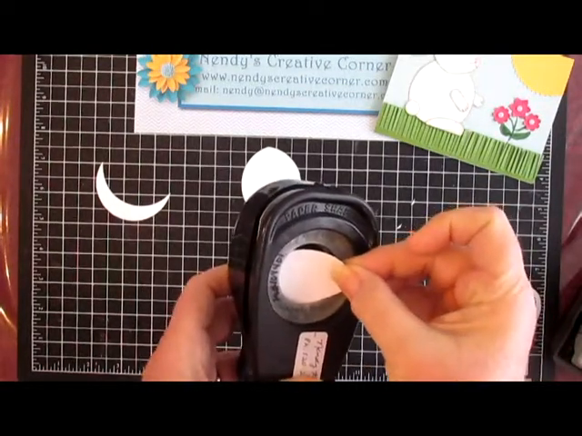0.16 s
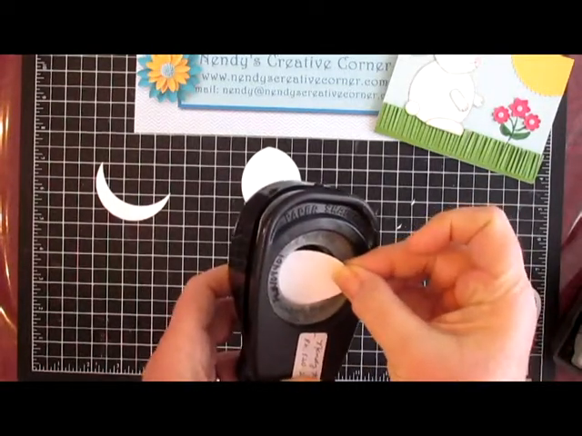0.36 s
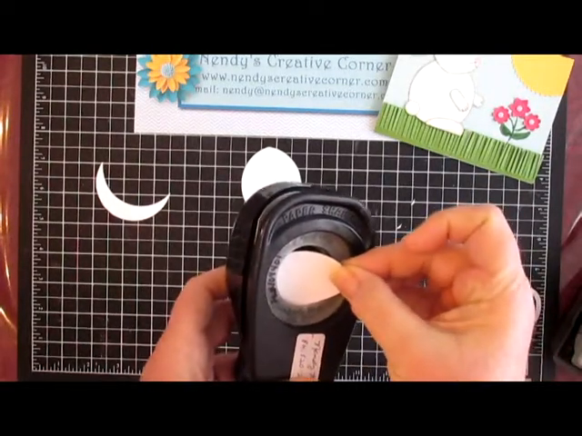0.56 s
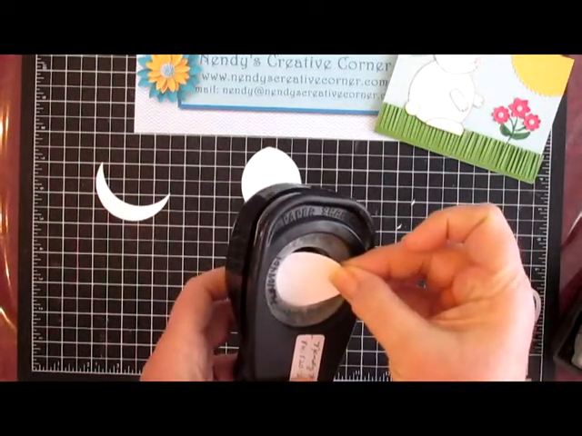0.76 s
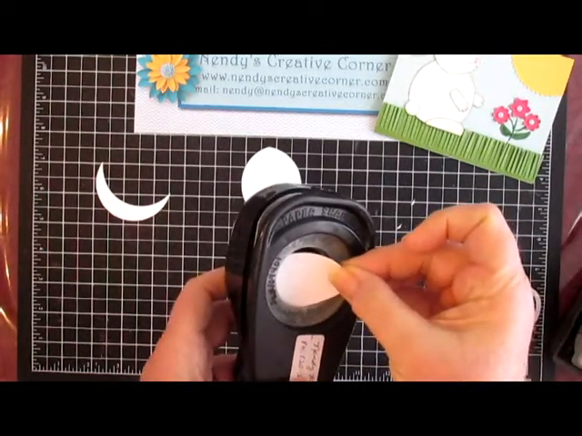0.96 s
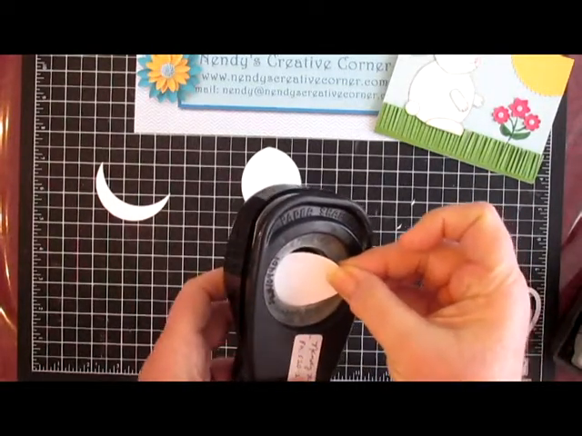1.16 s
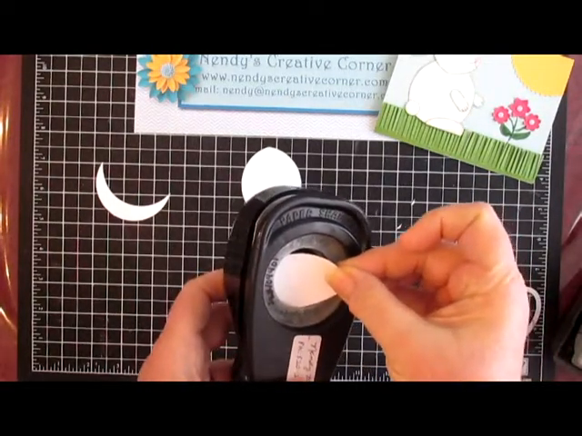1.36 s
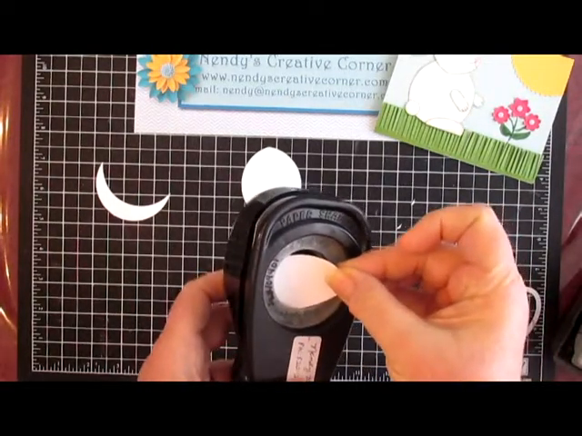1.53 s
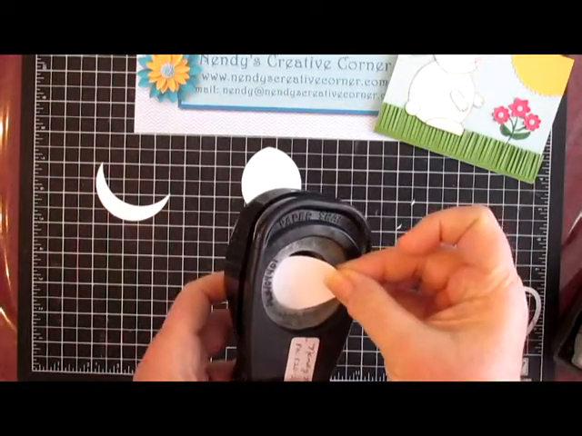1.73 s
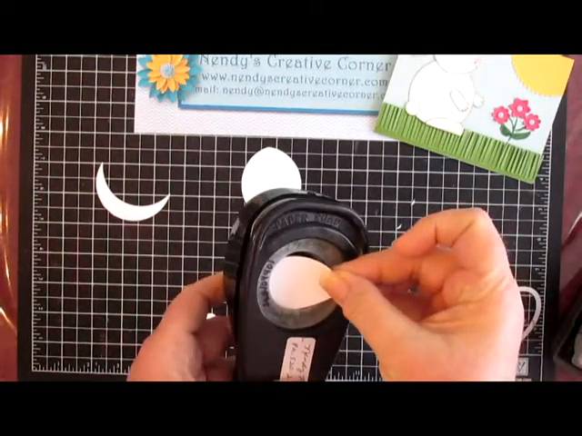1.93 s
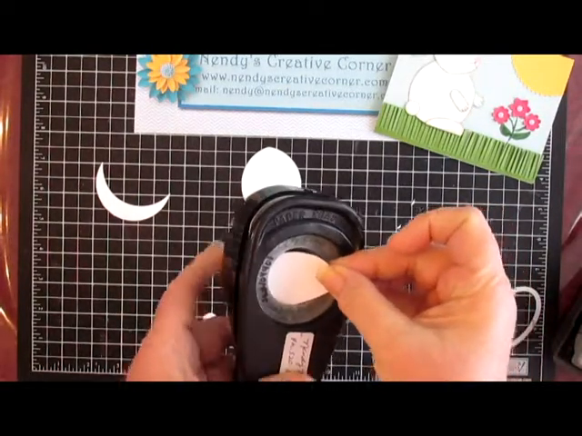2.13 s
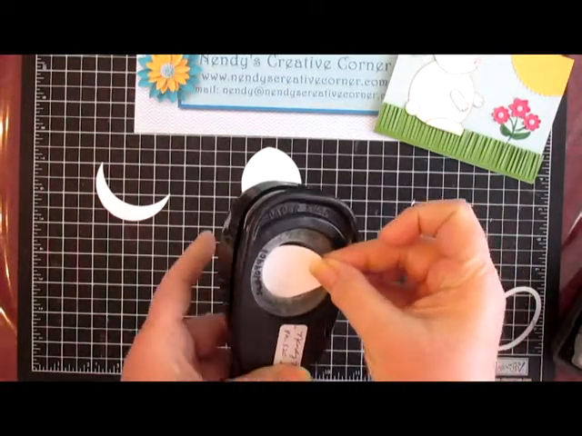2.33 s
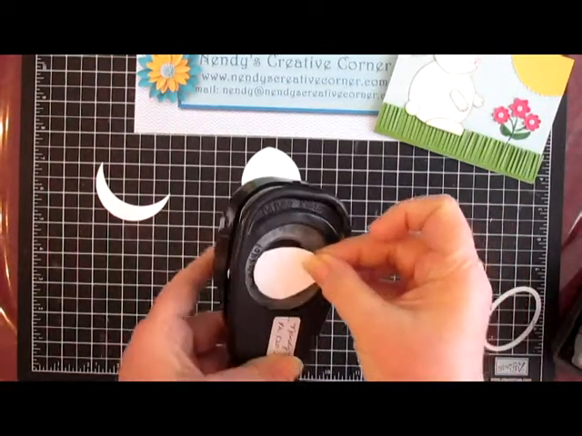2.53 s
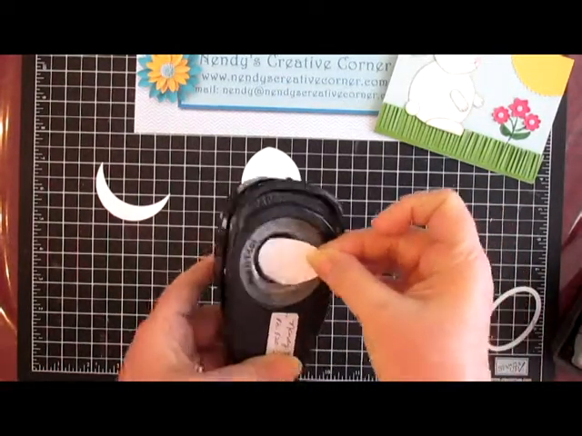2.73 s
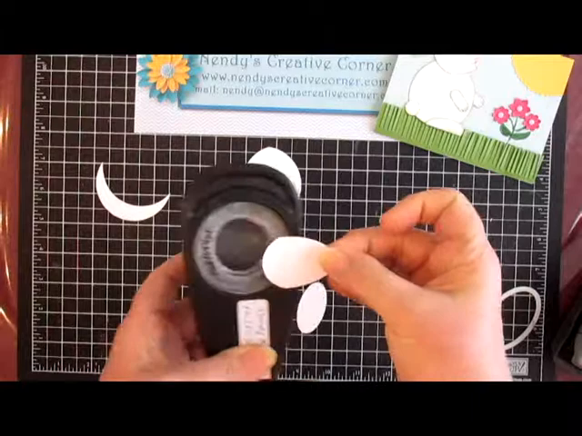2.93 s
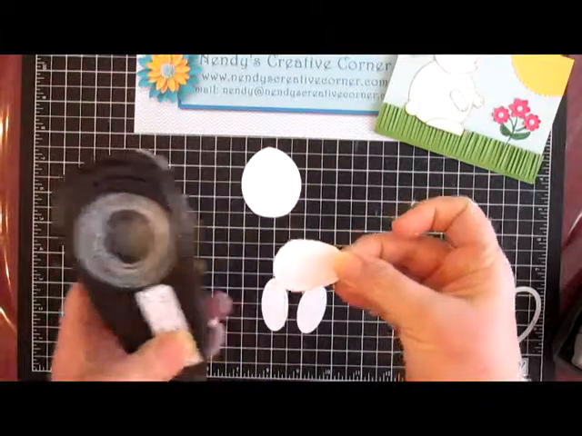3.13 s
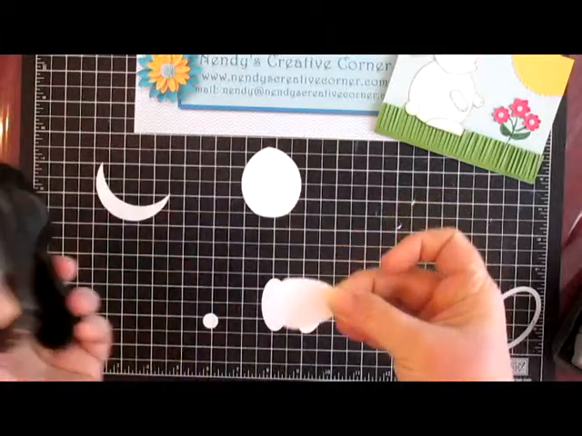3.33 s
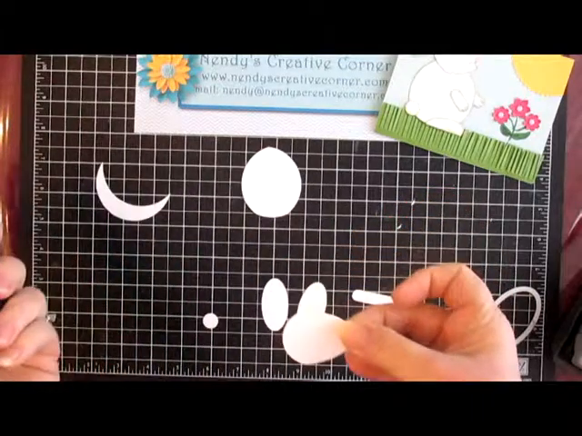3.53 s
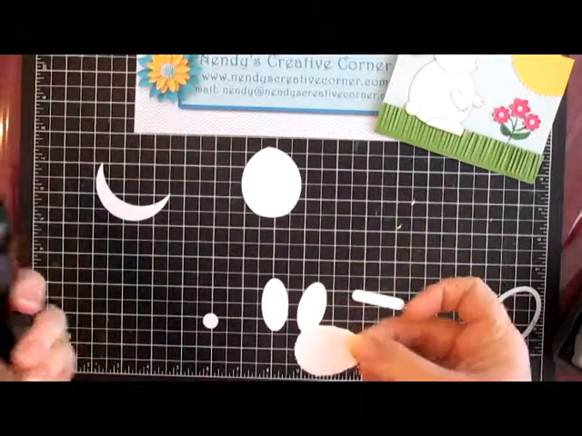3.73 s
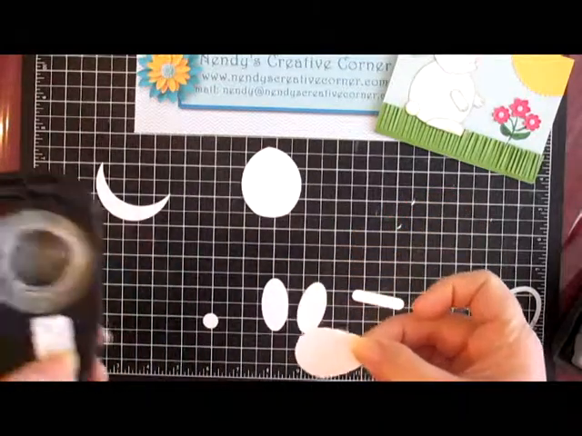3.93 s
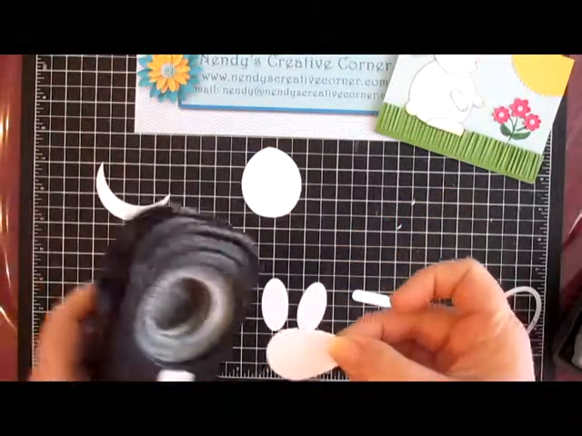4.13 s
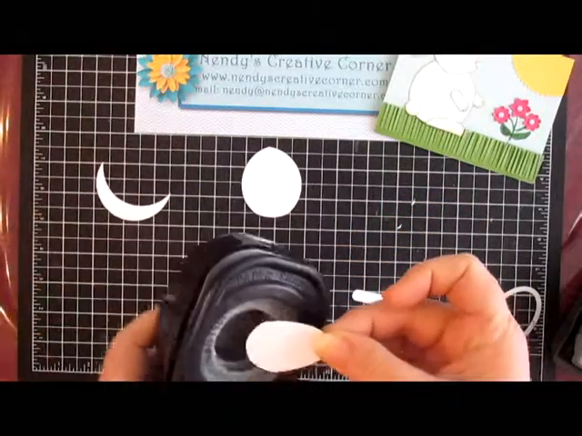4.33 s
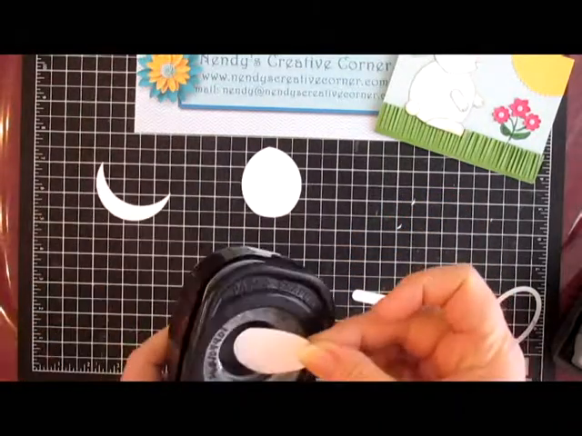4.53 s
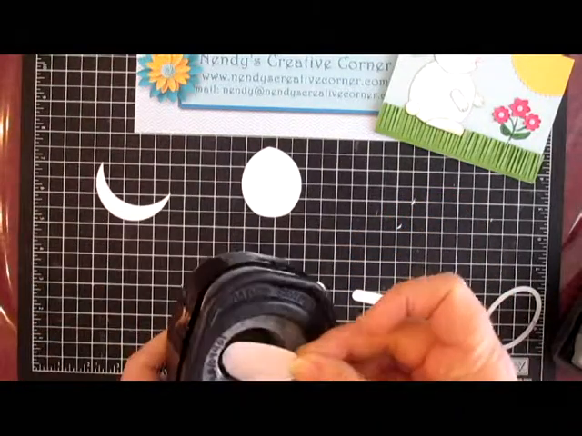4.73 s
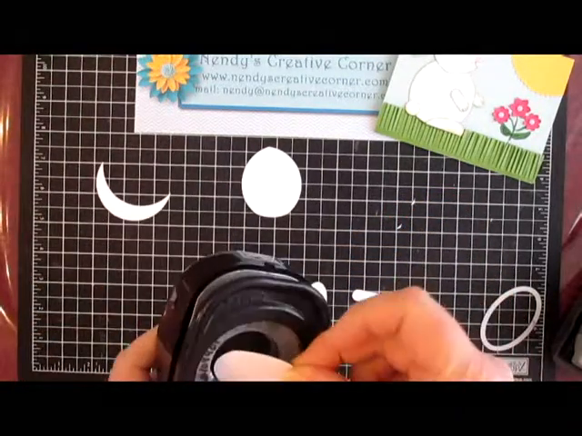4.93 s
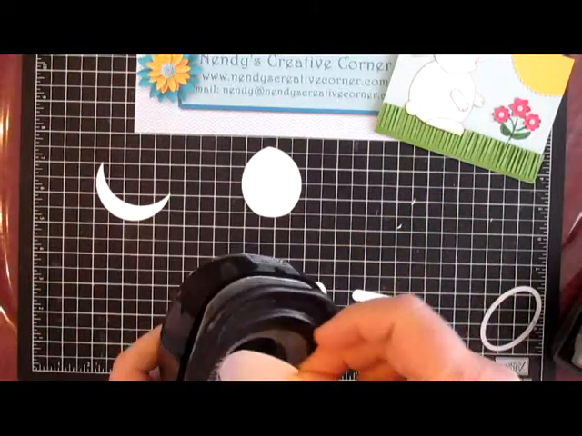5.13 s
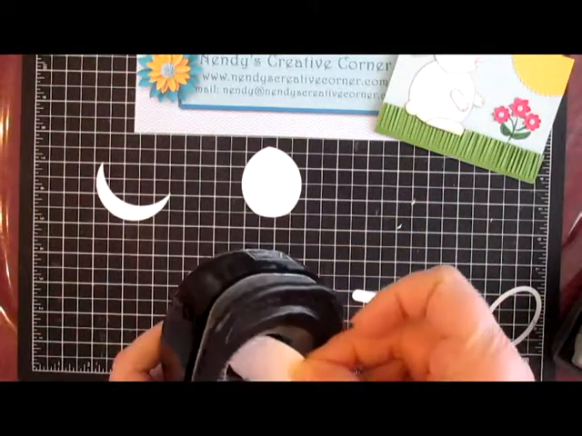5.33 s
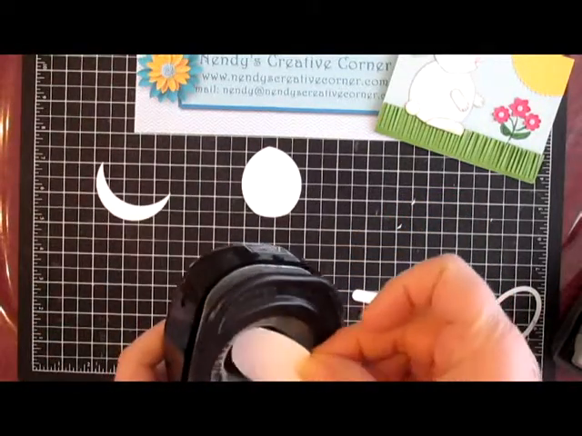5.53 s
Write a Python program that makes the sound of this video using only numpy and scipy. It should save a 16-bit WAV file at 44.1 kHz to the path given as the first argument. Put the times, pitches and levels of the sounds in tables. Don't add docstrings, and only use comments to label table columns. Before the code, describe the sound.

A handheld paper punch pings, crunches through thin card and snaps loudly, then is released, set down with a knock and picked up with light clicks.

```python
import sys
import numpy as np
from scipy import signal
from scipy.fft import rfft, irfft, next_fast_len
from scipy.io import wavfile
from scipy.ndimage import uniform_filter1d

SR = 44100
rng = np.random.default_rng(int(sys.argv[2]) if len(sys.argv) > 2 else 0)


def to_wav(sig):
    pcm = np.clip(np.atleast_2d(sig), -1, 1) * 32767
    pcm = np.round(pcm).astype(np.int16)
    wavfile.write(sys.argv[1], SR, pcm.T)


def natural_amplitude(level_db):
    exponent = np.asarray(level_db, float) / 20
    return 10 ** exponent


N = 246607

# (frequency [Hz], density [dB per Hz])
AIR_SPECTRUM = [(20, -21.5), (34, -27), (55, -6), (90, -15), (130, -12), (280, -9), (470, -10), (1030, -16),
                (2460, -29), (5800, -29), (8500, -31), (10500, -37.5), (13000, -32), (16000, -36)]
# (frequency [Hz], correlation [-1..1])
AIR_LIKENESS = [(60, 0.27), (180, 0.88), (550, 0.54), (1650, 0.047), (4970, 0.021), (15000, 0.061)]
# (frequency [Hz], waver width [Hz], level [dB rms], steady against wavering part [ratio])
HUM_LINES = [(63.3, 8, -78, 3.7), (119.2, 3.8, -60, 3.2), (159, 12, -68, .2), (196.8, 35, -64, 0.1965),
             (313, 17, -59, 0.66), (389.9, 21, -64, .2), (12620, 50, -108.5, 0.11)]
# (time [s], length [s], start frequency [Hz], end frequency [Hz], level [dB])
BIRD_CHIRPS = [(3.994, 0.022, 3020, 2940, -64), (4.006, 0.017, 3470, 3410, -68),
               (4.022, 0.023, 2740, 2150, -68), (4.115, .026, 3050, 2950, -71),
               (4.141, 0.018, 2790, 1950, -68), (4.229, .02, 4030, 3910, -71.5),
               (4.242, 0.015, 3140, 2970, -69.5), (4.26, 0.024, 2820, 1950, -68),
               (4.38, 0.031, 4090, 3920, -65.5), (4.406, 0.027, 3500, 3050, -63.5)]
# (frequency [Hz], t60 [s])
ROOM_DECAY = [(300, 0.55), (1500, 0.42), (5000, 0.28), (12000, 0.23)]
# (frequency [Hz], level [dB])
WALL_TONE = [(300, -3), (1200, -1), (2500, -2), (5000, -1), (9000, -1), (14000, -4.5)]
# (frequency [Hz], left minus right [dB])
PORT_TILT = [(300, -0.5), (1000, -1), (2200, -4.5), (4500, -1.5), (8000, 4.5), (13000, 2.5)]
# (frequency [Hz], left lead [rad])
PORT_LEAD = [(500, 0.0993), (2000, 0.33), (4500, 0.93), (8000, 0.35), (13000, 1)]

# (time [s], length [s], level [dB], bright part [dB re level], airy part [dB re level])
SCUFFS = [
    (.104, 0.043, -53.5, -18, -17),
    (2.131, 0.02, -49, -4, 3),
    (2.944, 0.059, -57, 5, -3),
    (5.408, 0.04, -56, -15, -16),
]
SLIDES = [(2.733, 0.085, -54, -5, -16), (3.01, 0.11, -61, -3, -9.5), (3.22, 0.18, -65.5, -11, -3),
          (3.36, 0.11, -61, -8, 2.5), (3.42, .125, -57, -14, 1), (3.51, 0.12, -62.5, -15, -3),
          (3.74, 0.18, -67, -12, 5), (3.765, 0.08, -59, -20, -16), (3.9, .13, -66, -14, -14),
          (4.57, 0.067, -73, 8, -14), (4.65, 0.077, -63.5, 4.5, -17), (4.76, 0.079, -69.5, -7.5, -10),
          (4.92, 0.18, -63.5, -13, -14.5), (5.19, 0.044, -53, -13, -11)]
# (frequency [Hz], width [Hz], level [dB])
RUB_LOW = [(1509, 500, 3.5), (3000, 1100, -5), (2340, 2500, 5.5), (4900, 5000, -7)]
RUB_BRIGHT = [(5920, 1650, 13), (6500, 1000, -5), (8550, 1400, 3.5)]
RUB_AIRY = [(10400, 29000, 7), (12400, 2700, -1), (14800, 2800, -16)]

# (time [s], peak [dB], slope away from the main ping [dB per octave], seat modes near 3.5 kHz
# [dB])
SPRING_SLIPS = [
    (1.718, -51, -18, -6),
    (1.774, -36.5, 5.5, 8.5),
    (1.8456, -26, -2, -5),
    (1.9387, -57, 8, -3),
    (1.745, -59, -20, -8),
    (1.989, -57, -15, -6),
]
# (frequency [Hz], level [dB], t60 [s])
SPRING_MODES = [(1284, -8.5, 0.15), (2310, -4, 0.075), (2490, 2, 0.098), (4600, -7, 0.053), (5330, -4, 0.046),
                (5510, -10, 0.14), (6060, -7, 0.11), (6630, -15, .12), (6960, -17, 0.21), (7650, -6.5, 0.059),
                (8700, -18, 0.091), (9600, -14, 0.035), (11840, -17, .02), (14200, -14, .015),
                (3400, -5.5, .085), (3770, -19.5, 0.14), (5050, -10, .07), (6380, -16, .15)]

# (time [s], peak at the die [dB], chatter [ms], shell [dB re die], lever [dB re die])
HANDLING = [
    (.108, -51.5, 2.5, 9, 9),
    (.118, -61, 4.5, 10, 9),
    (2.7437, -47.5, 2, -1, -12),
    (2.7483, -52.5, 3.9, -9, 8.5),
    (2.9478, -46, 1.8, -20, -1),
    (2.9965, -47.5, 7, -6, 0),
    (3.0534, -56, 2, -4, 2),
    (4.6885, -55, 3.5, 2, 1),
    (4.7675, -53.5, 3.3, -1.5, 6),
    (4.8, -57, 4.5, -14, 10.5),
]
RELOAD = [(5.1628, -68, 1.8, 11.5, 11.5), (5.1958, -59, 3.8, 12, 14), (5.2175, -57, 4.2, 18, 17),
          (5.2965, -57, 1.9, 18, 10), (5.2988, -44.5, 2.2, 12.5, 12), (5.3281, -44, 2, -11, 19),
          (5.3305, -39, 2, -6, 14), (5.334, -36, 2.2, 7.5, 4.7), (5.3425, -53, 2.8, 7, 9.3),
          (5.3514, -63, 4, 1, 20), (5.3617, -57, 2.5, 11, 16), (5.3774, -59, 2.7, 9, 23),
          (5.3857, -48.5, 2, 4, 22), (5.3904, -51, 2.2, 22, 15), (5.3955, -51, 4.2, 15, 16),
          (5.4005, -50, 1.8, 12, 17), (5.4035, -47, 3.6, 9, 17), (5.4208, -56, 2.2, -4, 6.7),
          (5.5394, -61, 5, 0, 9.2), (5.5665, -59.5, 5.4, -2, 7.7)]
RELEASE = [
    (2.804, -43, 4.4, 8, 4),
    (2.8066, -32, 4.2, -7, 16),
    (2.8086, -25, 2.6, -21, 5.9),
    (2.836, -61, 3, -8, 6),
]
DESK_HITS = [
    (3.6137, -31, 0.48, 20.2, 9),
    (3.6178, -49, .4, 18, 6),
    (3.6211, -47, .4, 21, 8),
    (3.6240, -51, 0.87, 23, 14),
    (3.6262, -50, 1.4, 20, 8),
    (3.6378, -57, .6, 27, 4.8),
    (3.649, -68, .6, 34, 4),
    (3.653, -71, 0.88, 36, 5),
    (3.6665, -66, .6, 29, 4),
]
STUTTER = [(3.7627, -46, 0.56, 13, 8), (3.7768, -52, 0.7, 17, 8.5), (3.7866, -50, 0.85, 17, 3.6),
           (3.8028, -68, .8, 18, 8), (3.7425, -65, 2, 21, 4), (3.5, -66, 1.5, 18, 11),
           (3.826, -64, 4, 16, 12), (3.794, -64, 2, 20, 10), (0.12, -64, 4, 14, 4), (.12, -65, 5, 16, 4),
           (3.771, -68, 2, 20, 6), (3.8345, -68, 1.5, 17, 10)]
BITES = [(2.110, -26, 1.46, -5, 2.5), (2.112, -32, 3.4, -2, 3), (2.1155, -37, 5, -2, 3),
         (2.1395, -48, 5, 0, 10), (2.2032, -31, 4.4, -14, -5.5), (2.2052, -17.5, 2.2, -19, -12),
         (2.2078, -26.5, 2.7, -14, 5), (2.214, -37.5, 3, -9, 0.5), (2.221, -41, 5.9, -4, 0),
         (2.2735, -22.5, 2.5, -6, -6), (2.2757, -21, 1.5, -10, -8), (2.2775, -18.5, 2.3, -12, -9.5),
         (2.281, -37, 4.4, 7, 1), (2.2903, -21, 1.8, -8, -5), (2.293, -30, 3.2, 1, 3)]
TEARS = [(2.3276, -25.5, 1.8, -5.5, 0.5), (2.330, -27, 1.4, 0, 4.5), (2.3325, -28, 2.3, 5, 4),
         (2.336, -40, 6, 7, 2.5), (2.352, -40.5, 2.4, 5, 2), (2.3552, -27, 3.7, 6.5, 2),
         (2.357, -20.5, 2.8, -8, 4), (2.3592, -29, 1.3, -0.5, -12.5), (2.3615, -24, 2.2, 1.5, -5.5),
         (2.365, -39.5, 6.8, 7, -1), (2.371, -42, 4.8, 6.5, 8)]
SNAP = [(2.4895, -58, 4, 10, 0), (2.500, -52, 3.5, 12, -1), (2.5041, -4, 2.2, -22, -16),
        (2.5056, -3.5, 1.6, -20, -14), (2.5078, -11, 2.5, -8, -2), (2.5172, -34, 1.3, 12, 1.5),
        (2.525, -30, 3, -3, 2), (2.515, -28, 1.5, 10, -1), (2.520, -33, 4.3, -0.5, -0.5),
        (2.537, -27.5, 5.6, -5.5, -4), (2.553, -43.5, 2, -5, 4.5), (2.542, -36, 1.5, 4, 6),
        (2.531, -36, 4, 2, 6)]
SLAM = [
    (2.5074, -12.5, 2.1, -6.5, 2),
    (2.5092, -22, 1.33, 17, 10),
    (2.5107, -16, 2.5, 2.5, 0),
    (2.5125, -19, 0.88, 15, 9.5),
]
# (time [s], peak at the
# die [dB], lever [dB re die], edge [dB re die])
TICKS = [(.195, -64, -5, 4), (.316, -62, 12, 3.7), (2.171, -58, 8, 6), (2.2908, -27, 9, 3),
         (2.411, -46.5, -3, 9.6), (3.8548, -66, -6, 20), (3.8563, -58, -7.5, 24.7), (1.637, -58, -10, 6),
         (5.022, -54.5, -6, 13), (5.028, -57, -4, 12), (5.178, -51.5, 6, 12), (5.3005, -38.5, 16.5, 3),
         (5.327, -48, -7, 12), (5.3332, -29.5, 13, 2.7), (5.407, -45, 2, 6), (1.846, -45, 2, 2),
         (2.3278, -36, -6, 8)]

# (low [Hz], high [Hz], level [dB])
ZONES = [(3920, 6200, 7), (694, 2550, 7.5), (2047, 4160, 8), (6280, 13000, -3.5)]
# (frequency [Hz], level [dB], t60 [s])
LOOSE = [(976, -10, 0.026), (1438, 6.5, 0.022), (1930, -16, 0.011), (2380, 4, 0.012), (2780, 3, 0.014),
         (3130, -8, 0.065), (3140, 13, 0.013), (3310, 10, 0.014), (4930, 0, 0.0088), (5600, -6, .004),
         (6326, 5, 0.0094), (7340, 11.5, 0.0076), (8250, 3, 0.005)]
SPRUNG = [(1100, 11, 0.061), (1330, -3, 0.019), (2150, -19, 0.012), (2560, 13, 0.014), (3150, 0, .18),
          (3050, 32, 0.0096), (2730, 9, 0.0046), (4200, 0, 0.0037), (6050, 0, 0.0046), (7110, 3, 0.0049),
          (7870, -2, 0.0073), (12500, -12, .003)]
THIN_PAPER = [(1390, 0, 0.0034), (3050, 0, 0.0051), (5595, 0, 0.0018), (9800, -11, 0.0012),
              (13600, 2, 0.00104)]
ON_DESK = [(814, -4, 0.0034), (1310, -11, 0.011), (1550, 20.5, 0.0064), (2150, 12.5, 0.0034),
           (3030, 9, 0.0076), (4800, -2, 0.0034), (5440, 0, .005), (6000, 8, 0.0089), (6830, 9, 0.0058),
           (8900, -4, 0.0049), (11500, -9, .002)]
DRAGGED = [(860, -6, .008), (1240, 2, .012), (1660, 4, .011), (2400, -4, 0.0069), (3000, -8, .005),
           (4175, -1, 0.0055), (5540, 5, .006), (7130, 1, .006), (9910, 1, .004), (11400, -3, .004)]
SQUEEZED = [(437, -6, 0.027), (840, 0.5, 0.029), (1058, -5.5, 0.0546), (1438, -2, 0.0227),
            (2420, -6.5, 0.006), (2908, 4, 0.00516), (3500, 7, 0.0064), (4970, 2.5, 0.01105),
            (4900, 4, 0.011), (4960, -19, 0.07), (4790, -23, .06), (7400, 5, 0.0019), (9200, -1.5, 0.0017),
            (12400, -5, .002)]
TEARING = [(821, -16.5, 0.021), (1073, 2, 0.065), (1445, 5, 0.022), (1950, -2, .008), (2410, 1, .014),
           (2554, 3, 0.018), (2936, -2.5, 0.015), (3600, -9.5, .008), (5100, 2, 0.012), (4900, -5.5, .01),
           (6880, 1.5, .006), (7650, 6, 0.003), (9600, 2.5, 0.0026), (11500, 2, 0.0043)]
BOTTOMED = [(1150, -4, .02), (1480, -2, 0.012), (2030, 4.5, 0.008), (2437, 0, .007), (3170, -1, 0.01),
            (4557, 12, .008), (4700, -28, .15), (5300, -8, .006), (6590, -3, 0.006), (7705, 2, 0.003),
            (9190, 1, 0.0026), (11780, -2, 0.004), (12740, -2, 0.0045)]
STOPPED = [(1160, -2.5, 0.027), (1480, -3, .01), (2030, 5, .007), (2437, -2.5, .006), (3170, -2, .008),
           (4400, 0, .004), (5240, 0, .005), (6520, 7, .006), (7120, -2, .008), (8330, 2, .004),
           (9190, 3, .003), (11800, 2, .004), (12400, 3, 0.0043)]
# (frequency [Hz], level [dB], t60 [s])
HOLLOW_MODES = [(394, 0, .22), (420, -2, 0.12), (770, -4, .03)]


def evened(x):
    return x / np.sqrt(np.mean(x ** 2) + 1e-20)


def read(points, hz):
    f, value = np.transpose(points)
    return np.interp(np.log(hz + 1), np.log(f + 1), value)


def add(mix, s, sound):
    part = mix[round(s * SR):][:len(sound)]
    part += sound[:len(part)]


def highpass(x, hz, order=4):
    return signal.sosfilt(signal.butter(order, hz, "high", fs=SR, output="sos"), x)


def resonate(x, hz, width):
    r = np.exp(-np.pi * width / SR)
    return 2 * signal.lfilter([1 - r], [1, -r * np.exp(2j * np.pi * hz / SR)], x).real


def ring(modes, extra_db):
    hz, db, t60 = np.transpose(modes)[:, :, None]
    length = min(6000, max(600, round(1.3 * t60.max() * SR)))
    t = np.arange(length) / SR
    level_db = db + extra_db[:len(modes), None] - 60 * t / t60
    return (natural_amplitude(level_db) * np.sin(2 * np.pi * hz * t)).sum(0)


def air():
    hz = np.fft.rfftfreq(N, 1 / SR)
    left, other = rfft(rng.standard_normal((2, N)))
    same = np.clip(read(AIR_LIKENESS, hz), -1, 1)
    right = same * left + np.sqrt(1 - same ** 2) * other
    wash = irfft(np.array([left, right]) * natural_amplitude(read(AIR_SPECTRUM, hz)), N)
    out = natural_amplitude(-51.5 - 4.0) * evened(wash)
    t = np.arange(N) / SR
    shared, apart = rng.standard_normal((2, N))
    drive = [shared + 0.285 * apart, shared - 0.53 * apart]
    for f, width, db, steady in HUM_LINES:
        waver = evened(resonate(resonate(drive, f, width), f, width))
        out = out + natural_amplitude(db) * evened(steady * np.sin(2 * np.pi * f * t) + waver)
    return out


def bird():
    out = np.zeros(N)
    for s, length, from_hz, to_hz, db in BIRD_CHIRPS:
        hz = np.linspace(from_hz, to_hz, round(length * SR))
        whistle = np.sin(2 * np.pi * np.cumsum(hz) / SR)
        add(out, s, natural_amplitude(db) * whistle * np.hanning(len(hz)) ** .5)
    return out


def room(x):
    taps = np.zeros((2, SR // 2))
    grid = np.arange(200, SR // 2 - 20, 20)
    at = grid + rng.integers(0, 20, (2, len(grid)))
    np.put_along_axis(taps, at, rng.choice([-1., 1.], at.shape), 1)
    taps[1] = .75 * taps[0] + .66 * taps[1]
    hz, t, z = signal.stft(taps, SR, nperseg=256)
    walls = natural_amplitude(-60 * t / read(ROOM_DECAY, hz)[:, None])
    shelves = natural_amplitude(4 - 60 * t / 0.082)
    shaped = z * natural_amplitude(read(WALL_TONE, hz))[:, None] * (walls + shelves)
    tail = signal.istft(shaped, SR, nperseg=256)[1]
    return signal.fftconvolve(x[None], tail / np.linalg.norm(tail[0]), axes=1)[:, :N]


def ports(x, pan_db):
    size = next_fast_len(N)
    hz = np.fft.rfftfreq(size, 1 / SR)
    half = natural_amplitude((read(PORT_TILT, hz) + pan_db) / 2) * np.exp(.5j * read(PORT_LEAD, hz))
    return irfft(rfft(x, size) * np.array([half, 1 / half]), size)[:, :N]


def rubs():
    out = np.zeros(N)
    roughness_db = 10.0 * uniform_filter1d(rng.exponential(1, N), 30)
    grain = rng.standard_normal(N) * natural_amplitude(roughness_db)
    bands = []
    for modes in (RUB_LOW, RUB_BRIGHT, RUB_AIRY):
        band = sum(natural_amplitude(db) * resonate(resonate(grain, hz, w), hz, w) / np.sqrt(w) for hz, w, db in modes)
        bands.append(evened(band))
    for rows, top_at, fade_db in (SCUFFS, 0.21, -9.5), (SLIDES, 0.5, -4):
        for s, length, db, bright_db, airy_db in rows:
            u = np.linspace(0, 1, round(length * SR))
            low, bright, airy = (b[round(s * SR):][:len(u)] for b in bands)
            swell_db = np.interp(u, [0, top_at, 1], [fade_db, 0, fade_db])
            stroke = natural_amplitude(db + swell_db) * signal.windows.tukey(len(u), .7)
            add(out, s, stroke * (low + natural_amplitude(bright_db) * bright + natural_amplitude(airy_db) * airy))
    return out


def spring():
    out, modes = np.zeros(N), SPRING_MODES
    hz = np.array(modes)[:, 0]
    octaves, seat = np.log2(hz / 2450), abs(hz - 3550) < 300
    for s, db, bright_db, seat_db in SPRING_SLIPS:
        slope_db = np.where(octaves > 0, bright_db, abs(bright_db))
        ping = ring(modes, slope_db * octaves + seat_db * seat)
        ping *= np.minimum(np.arange(len(ping)) / (0.00098 * SR), 1)
        add(out, s, natural_amplitude(db) * ping / abs(ping).max())
    return out


def clicks(rows, body, uneven_db, noisy_db, top_hz):
    out, bins = np.zeros(N), np.fft.rfftfreq(1024, 1 / SR)
    signs = rng.standard_normal((32, 600))
    sizes = rng.exponential(1, (32, 600))
    lucks = rng.standard_normal((32, 15))
    zones, bands = [], []
    for lo_hz, hi_hz, _ in ZONES:
        zones.append([m for m in body if lo_hz <= max(m[0], 700) < hi_hz])
        bands.append(signal.butter(2, [lo_hz, min(hi_hz, top_hz)], "band", fs=SR, output="sos"))
    for (s, db, ms, *zones_db), sign, size, luck in zip(rows, signs, sizes, lucks):
        u = np.arange(600) / (SR * max(ms, .1) / 1000)
        envelope = np.minimum(8 * u + 0.27, 1) * np.exp(-u ** 2.9)
        chatter = sign * natural_amplitude(uneven_db * np.minimum(size, 4)) * envelope
        power = abs(rfft(chatter, 1024)) ** 2
        for modes, band, (*_, crack_db), zone_db in zip(zones, bands, ZONES, (0, *zones_db)):
            hz, _, t60 = np.transpose(modes)[:, :, None]
            reach = 1 / (1 + ((bins - hz) / (1.1 / t60 + 40)) ** 2)
            fed_db = 10 * np.log10(reach @ power / reach.sum(1))
            crack = signal.sosfilt(band, chatter)
            zone = signal.fftconvolve(chatter, ring(modes, 1.5 * luck[:len(modes)] - fed_db))
            zone /= abs(zone).max()
            zone[:600] += natural_amplitude(crack_db + noisy_db) * crack / abs(crack).max()
            add(out, s, natural_amplitude(db + zone_db) * zone / abs(zone).max())
    return out


def edged(rows, edge_db):
    return [(*row, edge_db) for row in rows]


def paper_ticks():
    chatter_ms, shell_db = 0.37, -20.5
    rows = [(s, db, chatter_ms, shell_db, *zones_db) for s, db, *zones_db in TICKS]
    return clicks(rows, THIN_PAPER, uneven_db=6.5, noisy_db=4.0, top_hz=15900)


def handling():
    rows = edged(HANDLING, edge_db=0.5) + edged(RELOAD, edge_db=9.0)
    return highpass(clicks(rows, LOOSE, uneven_db=4.5, noisy_db=-23.5, top_hz=8300), 900, order=2)


def spring_back():
    return highpass(clicks(edged(RELEASE, edge_db=7.0), SPRUNG, uneven_db=5.5, noisy_db=-9.0, top_hz=11410), 1000)


def set_down():
    desk = clicks(edged(DESK_HITS, edge_db=8.0), ON_DESK, uneven_db=1.5, noisy_db=-10.0, top_hz=14000)
    return highpass(desk - 0.26 * resonate(desk, 3900, 1530), 620)


def drag():
    return clicks(edged(STUTTER, edge_db=3.0), DRAGGED, uneven_db=3.5, noisy_db=-15.0, top_hz=14000)


def bite():
    out = clicks(edged(BITES, edge_db=-6.0), SQUEEZED, uneven_db=1.5, noisy_db=-10.0, top_hz=15000)
    return out - .9 * resonate(out, 1874, 550)


def tear():
    return clicks(edged(TEARS, edge_db=1.5), TEARING, uneven_db=-0.5, noisy_db=-7.0, top_hz=15000)


def snap():
    out = clicks(edged(SNAP, edge_db=-3.5), BOTTOMED, uneven_db=-3.5, noisy_db=-12.5, top_hz=14220)
    return highpass(natural_amplitude(3) * out, 980)


def hollow():
    out = np.zeros(N)
    add(out, 2.506, natural_amplitude(-30) * ring(HOLLOW_MODES, np.zeros(len(HOLLOW_MODES))))
    return out


def stop_slam():
    out = clicks(edged(SLAM, edge_db=10.0), STOPPED, uneven_db=-1.5, noisy_db=-12.0, top_hz=14200)
    return highpass(natural_amplitude(3) * out, 1020)


def scene():
    background, far = air(), bird()
    hands = rubs() + spring() + paper_ticks() + handling() + spring_back()
    desk, dragged = set_down(), drag()
    press = bite() + tear() + snap() + hollow()
    slam = stop_slam()
    near = ports(press, pan_db=0.9) + ports(hands, pan_db=1.0) + ports(desk, pan_db=7.0) + far
    near += ports(slam, pan_db=0.6) + ports(dragged, pan_db=5.0)
    desk_sent = desk - 0.4 * resonate(desk, 1100, 600)
    near += room(natural_amplitude(-12.5) * press + natural_amplitude(-13.5) * hands + natural_amplitude(-9.5) * (desk_sent + far))
    near += room(natural_amplitude(-16.5) * slam + natural_amplitude(-9) * dragged)
    return highpass(near, 340) + background


def roll_off(x):
    return signal.sosfilt(signal.butter(12, 16650, fs=SR, output="sos"), x)


def record(dry):
    power_db = 10 * np.log10(abs(uniform_filter1d((dry ** 2).mean(0), 150)) + 1e-12)
    fall_db = np.arange(N) * 13.5 / SR
    held_db = np.maximum.accumulate(power_db + fall_db) - fall_db
    over_db = np.maximum(held_db + 11.0, 0)
    ducked = dry / natural_amplitude(.9 * uniform_filter1d(over_db, 150))
    kneed = .8 * np.tanh(ducked / .8)
    mix = signal.sosfilt(signal.cheby2(8, 30, 16100, fs=SR, output="sos"), kneed)
    return roll_off(mix)


dry = scene()
out = record(dry)
to_wav(out)
```